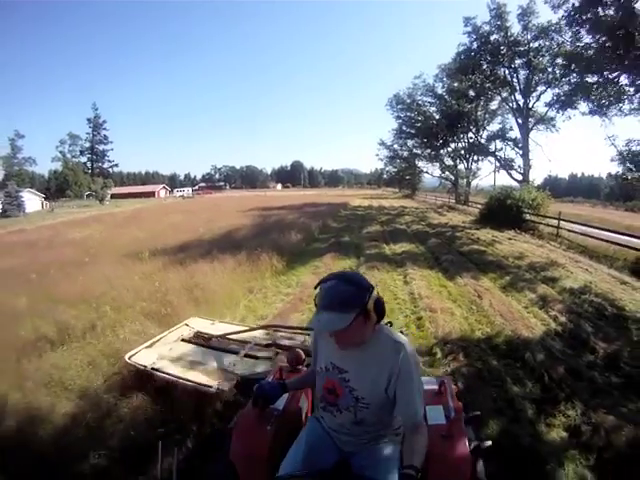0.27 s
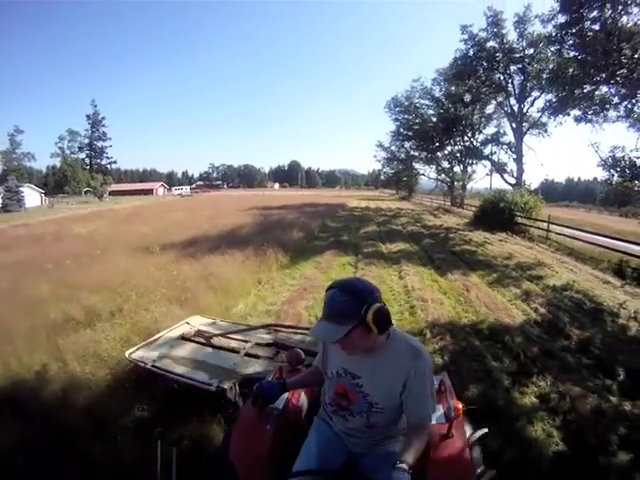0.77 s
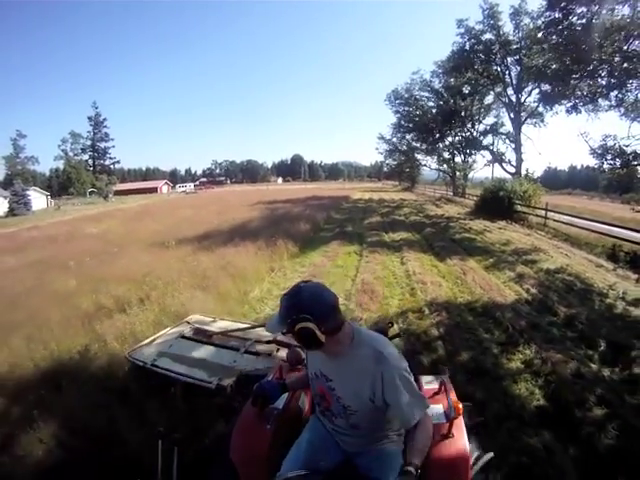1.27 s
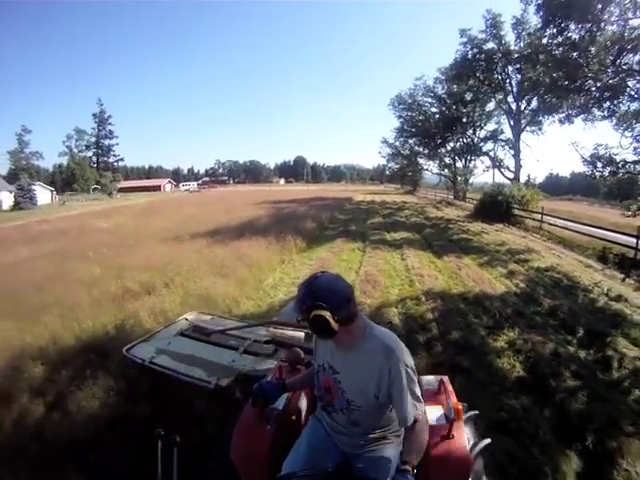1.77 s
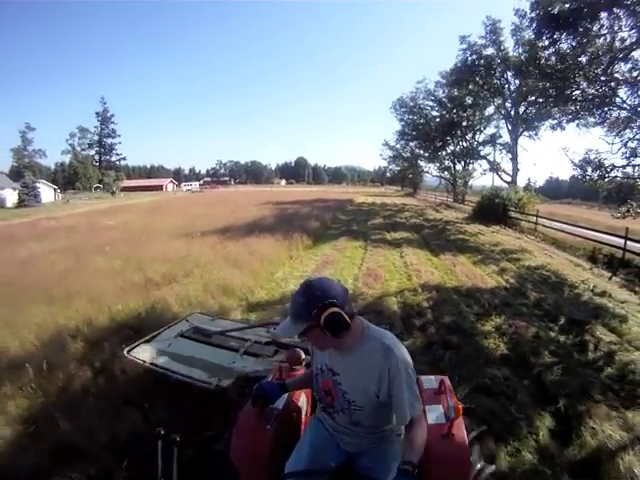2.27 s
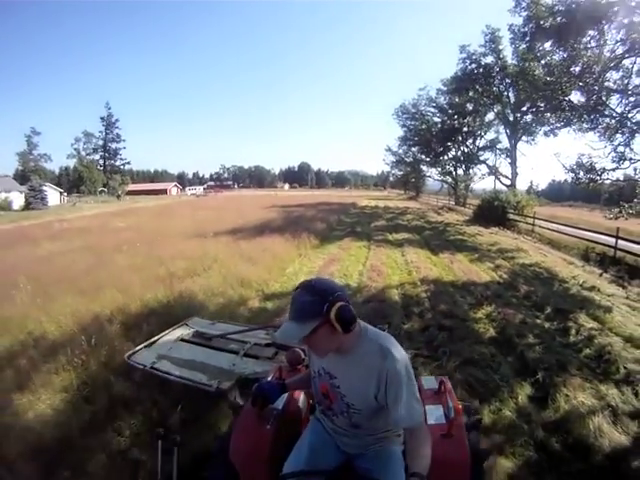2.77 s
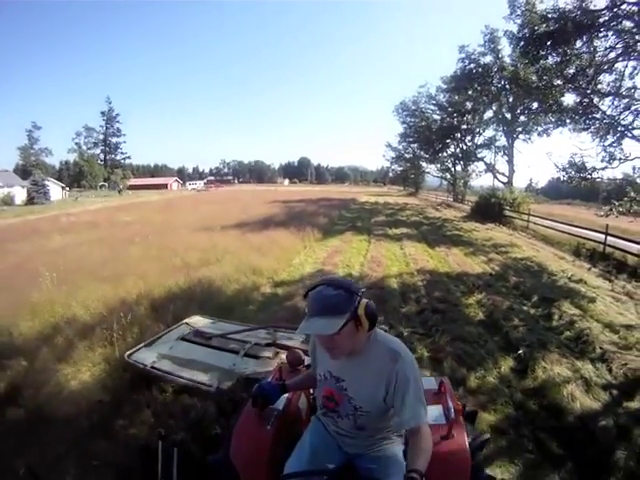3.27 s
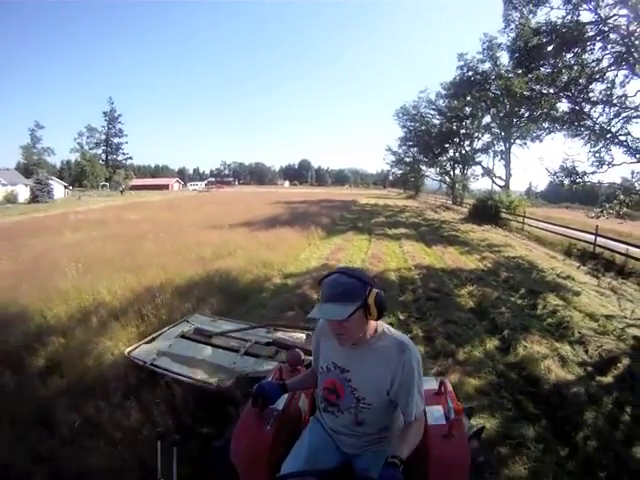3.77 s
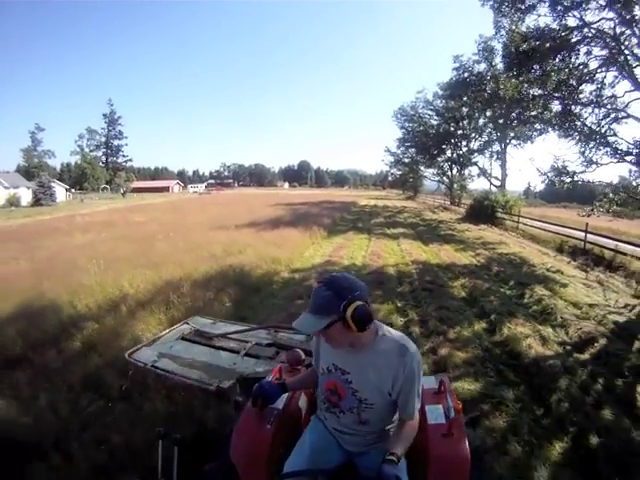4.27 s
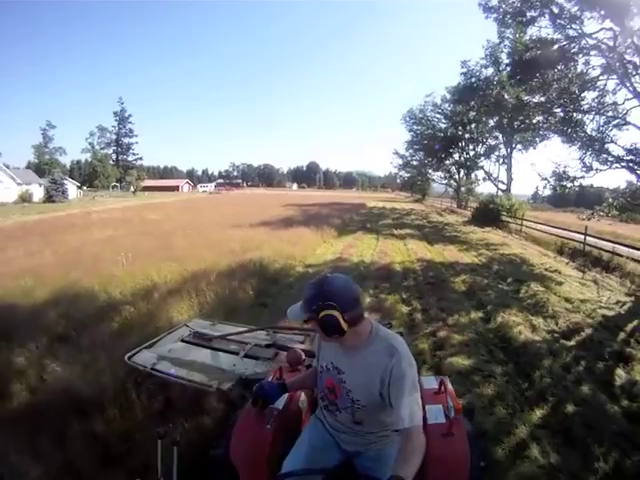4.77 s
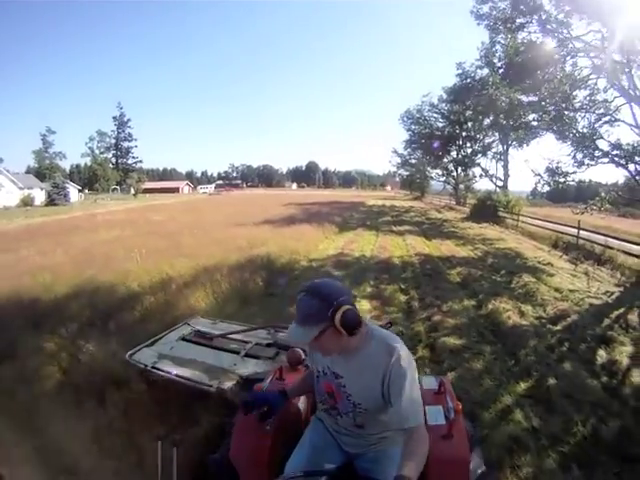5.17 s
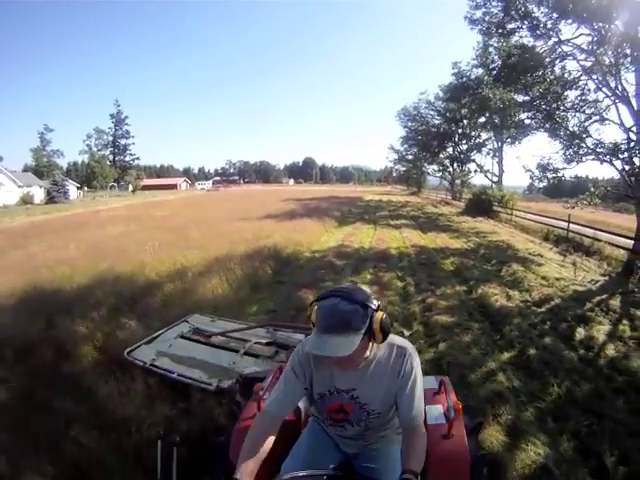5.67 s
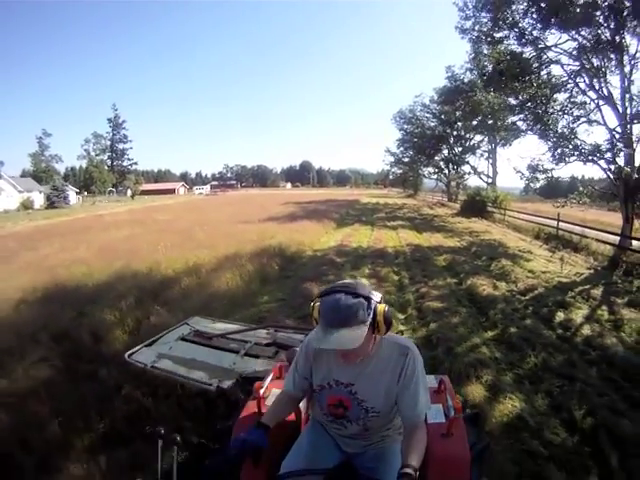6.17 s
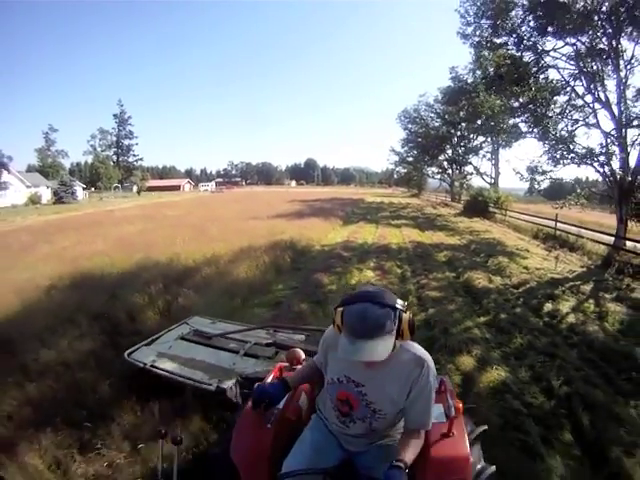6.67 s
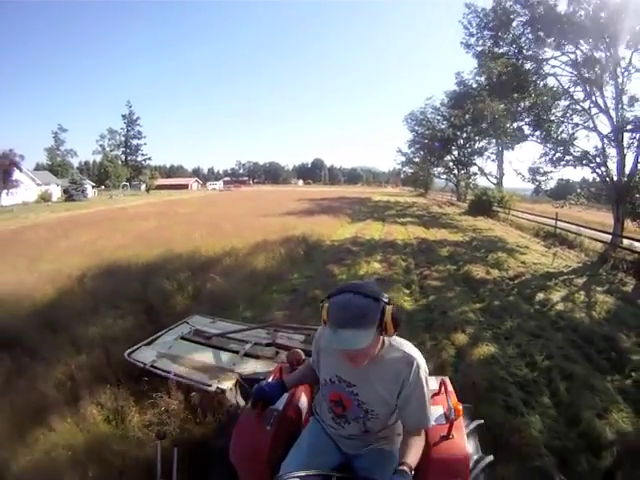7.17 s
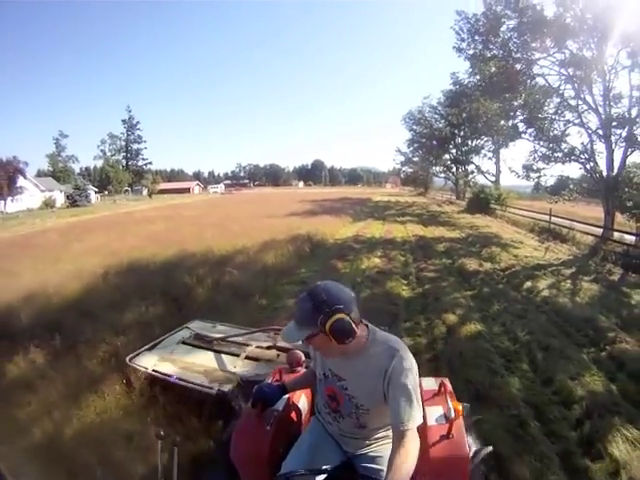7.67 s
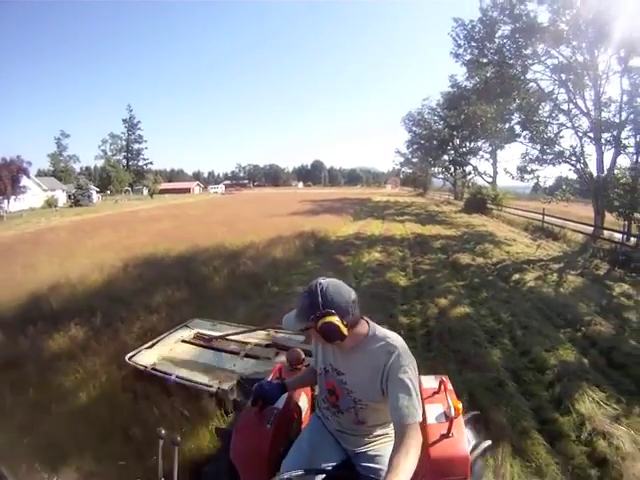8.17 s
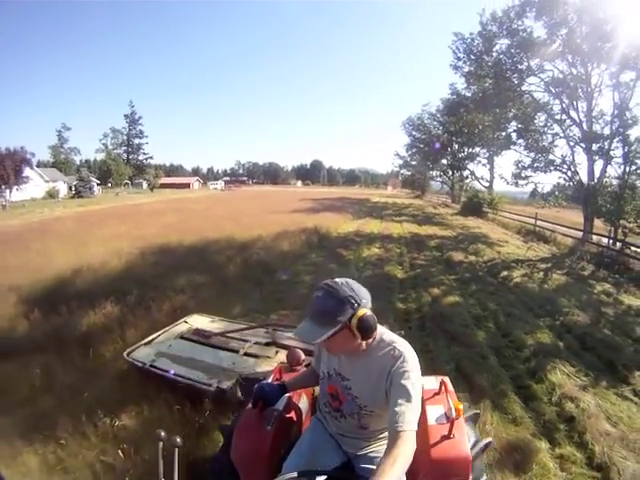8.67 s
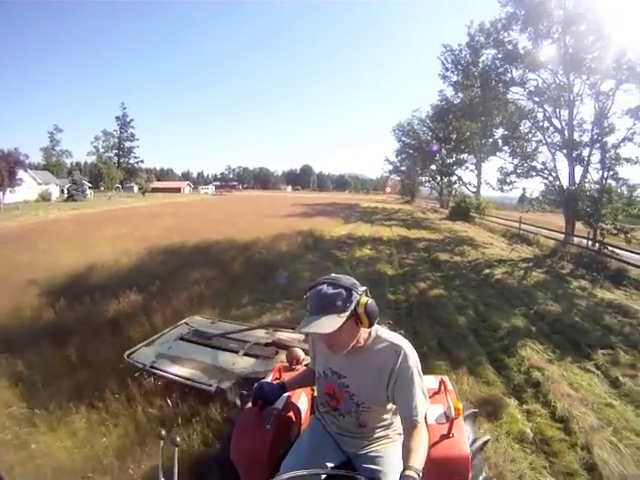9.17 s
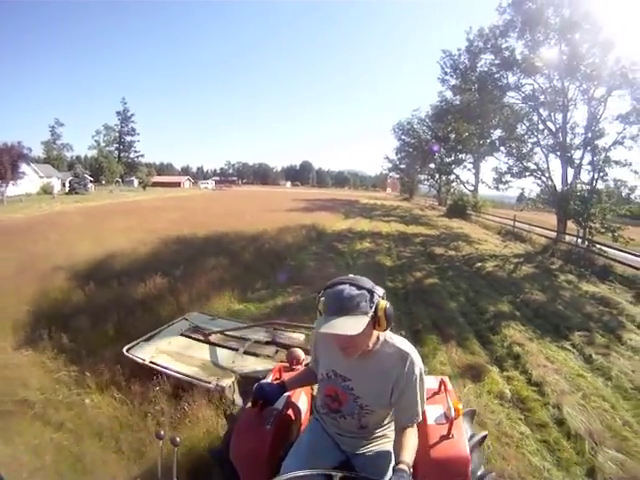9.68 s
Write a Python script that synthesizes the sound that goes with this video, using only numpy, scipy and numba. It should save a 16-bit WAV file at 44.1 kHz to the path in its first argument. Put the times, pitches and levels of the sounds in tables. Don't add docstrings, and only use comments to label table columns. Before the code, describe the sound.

Relentless close clatter of a diesel pulling a drum mower through grass, rasping and whining, sagging slightly, then revving a little faster near seven seconds.

```python
import sys
import numpy as np
from scipy import signal
from scipy.fft import rfft, irfft, next_fast_len
from scipy.io import wavfile
from scipy.ndimage import uniform_filter1d
from numba import njit

SR = 44100
rng = np.random.default_rng(int(sys.argv[2]) if len(sys.argv) > 2 else 0)


def wav_out(sig):
    wavfile.write(sys.argv[1], SR, np.round(np.clip(np.atleast_2d(sig).T, -1, 1) * 32767).astype(np.int16))


def rack_gain(trim_db):
    fader = np.asarray(trim_db, float)
    return 10 ** (fader / 20)


N = 437031
TIME = np.arange(N) / SR


def level(x, db):
    return x * rack_gain(db) / np.sqrt(np.mean(x ** 2))


def ring(x, modes, dead=(), unrelated=False):
    size = next_fast_len(N + SR)
    f = np.fft.rfftfreq(size, 1 / SR) + 1e-6

    def bell(hz, width):
        return 1 / (1 + 1j * (f / hz - hz / f) * hz / width)

    parts = [np.prod(sign) * rack_gain(db) * bell(hz, width) ** 2 for hz, width, db, *sign in modes]
    if unrelated:
        gain = np.sqrt(sum(np.abs(part) ** 2 for part in parts))
    else:
        gain = sum(parts)
    for hz, width, depth in dead:
        gain = gain * (1 - depth * bell(hz, width))
    return irfft(rfft(x, size) * gain, size)[:N]


def walk(rate):
    k = int(SR / rate)
    steps = np.repeat(rng.standard_normal(N // k + 1), k)
    return 1.24 * uniform_filter1d(uniform_filter1d(steps, k), k)[:N]


def bumps(events, half_s):
    return sum(db * np.exp(-.5 * ((TIME - at) / half_s) ** 2) for at, db in events)


def blows(turns, place, db, scatter_db, wander):
    cycle = np.arange(-1, turns[-1] + 1)
    chance = np.clip(rng.standard_normal((len(cycle), 2)), -1.6, 1.6)
    at = np.searchsorted(turns, cycle + place + wander * chance[:, 0])
    keep = (at > 0) & (at < N)
    out = np.zeros(N)
    out[at[keep]] = rack_gain(db + scatter_db * chance[keep, 1])
    return out


# (time [s], speed [cycles/s])
SPEED = [
    (0, 15.186),
    (.8, 15.079),
    (1.98, 15.133),
    (2.12, 15.063),
    (5.79, 14.829),
    (7.09, 15.669),
    (7.55, 16.217),
    (8.56, 16.406),
    (9.91, 16.255),
]


def engine_turns():
    start_turns = -.2139
    return start_turns + np.cumsum(np.interp(TIME, *np.transpose(SPEED))) / SR


SPEED_RANGE = 15.05, 16.35


def fastness(turns):
    return np.interp(np.gradient(turns) * SR, SPEED_RANGE, (0, 1))


# (time [s], cutting effort level [dB], linkage slack level [dB])
GRASS = [(0, -24, 4), (.25, -22.5, 2), (.55, -20, 9), (.85, -21.5, -4), (1.15, -23, 7), (1.55, -22.5, 5),
         (2.05, -23, 4.5), (2.45, -24, 1), (2.8, -22, 7), (3.3, -21.5, 1), (4.1, -22, 3.5), (4.7, -21, 0),
         (5.4, -22, 5), (6.2, -21.5, 3.5), (7.6, -23, -1), (8.4, -22.5, -6.5), (9.5, -19, 4),
         (9.91, -19, 4.5)]


def grass():
    even_grass_db = -21.5
    s, effort_db, slack_db = np.transpose(GRASS)
    return np.interp(TIME, s, effort_db - even_grass_db), np.interp(TIME, s, slack_db)


# (time [s], level [dB])
CLUMPS = [(.2, 1.5), (.4, 0.5), (.57, 0), (1.0, 2.5), (1.16, 3), (1.35, 1.5), (1.68, 3), (2.0, 0.5),
          (2.33, 1), (3.75, 1), (3.92, 2), (4.42, 1), (4.82, 0.5), (5.07, 2), (5.56, 1), (6.1, -0.5),
          (7.95, 3.5), (8.7, 0.5), (9.47, -0.5), (9.6, 1.5)]


def clump_jolts():
    return bumps(CLUMPS, half_s=.046)


# (place [0-1], length [0-1], level [dB])
GUSTS = [
    (0, .05, 2.),
    (.28, .05, 2.5),
    (.75, .1, 1.2),
]
# (pitch [Hz], width [Hz], level [dB])
RUMBLE = [(140, 220, -29), (265, 90, -28)]
# (pitch [Hz], width [Hz], level [dB])
SHELL = [(317, 175, -26.5), (563, 90, -24.5), (695, 51, -22), (788, 113, -28), (1053, 320, -26.5),
         (1067, 25, -24), (1232, 37, -23.5), (1316, 110, -23), (1539, 12, -18.5), (1730, 38, -53),
         (1820, 320, -21.5), (2112, 142, -8), (2464, 310, -18.5), (2630, 26, -20.5), (2767, 160, -16.5),
         (3020, 170, -19.5), (3255, 273, -10.5), (3520, 59, -11.5), (3851, 183, -11.5), (4034, 125, -19.5),
         (4400, 213, -20.5), (4802, 255, -27.5), (5296, 190, -29), (5730, 360, -40)]
# (pitch [Hz], width [Hz], depth [0-1])
DEAD = [(930, 120, .7), (1490, 50, .65), (2910, 90, .75), (4640, 150, .6), (5055, 200, .88)]


def drums(turns):
    gust_db = 0
    for place, length, db in GUSTS:
        away = (turns - place + .5) % 1 - .5
        gust_db = gust_db + db * np.exp(-.5 * (away / length) ** 2)
    shake = rack_gain(gust_db + .43 * walk(12) + 1.56 * walk(70)) * rng.standard_normal(N)
    stems = (rng.random(N) < 250 / SR) * rng.uniform(-1.18, 1, N)
    return level(ring(shake + 10.3 * stems, RUMBLE + SHELL, DEAD, unrelated=True), 0)


# (pitch [Hz], width [Hz], level [dB])
COVER = [
    (454.1, 39, 5),
    (423.7, 58, -3.5),
]


def hum(turns):
    shaft_beats = 28
    air = rack_gain(walk(3.42)) * rng.standard_normal(N)
    nudge = blows(turns, .2278, 29, scatter_db=.5, wander=.017)
    wavering = rack_gain(-27) * np.sin(2 * np.pi * COVER[0][0] * TIME + 4.5 * walk(14))
    locked = rack_gain(-25) * fastness(turns) ** 2 * np.sin(2 * np.pi * shaft_beats * turns + .4 * walk(5))
    return level(ring(air + nudge + wavering + locked, COVER), 0)


# (beats [per cycle], level [dB], phase [0-1])
ENGINE_TONES = [(4, -49, .33), (5, -56, .93), (13, -54, .66), (16, -46.5, .3), (17.1, -49, 0), (21, -57, 0)]
# (teeth met [per cycle], level [dB], phase waver [rad])
GEARS = [
    (116, -37.5, 1.3),
    (71, -50, .6),
    (100, -52, .8),
]


def gears(turns):
    out = 0
    for beats, db, phase in ENGINE_TONES:
        out = out + np.sqrt(2) * rack_gain(db) * np.sin(2 * np.pi * (beats * turns + phase))
    for teeth, db, waver in GEARS:
        throb = rack_gain(2.5 * walk(12) + 4.5 * np.cos(2 * np.pi * (turns - .6)))
        whine = np.sin(2 * np.pi * teeth * turns + waver * walk(35))
        out = out + level(throb * whine, db)
    return out


# (place [0-1], level [dB], clean share [0-1])
FOLLOWERS = [(.205, -13, .6), (.26, -11.5, .7), (.55, -16, .6), (.8, -19, .6), (.68, -22, .4),
             (.4, -21, .4)]
# (pitch [Hz], width [Hz], level [dB], polarity [+-1])
KNOCKED = [(2158, 135, 0, 1), (2288, 126, -12.3, -1), (2081, 72, -17.8, -1), (2392, 110, -16.4, -1),
           (1909, 84, -21.7, -1)]
# (pitch [Hz], width [Hz], level [dB])
KNOCKED_WEAKLY = [(1061, 76, -26.5), (1357, 99, -30), (1760, 50, -21.5), (2793, 270, -24.5),
                  (3784, 200, -20)]


def knock(turns, follower_db):
    lead = .043
    main = blows(turns, -lead, 0, scatter_db=.8, wander=.001)
    rattle = np.exp(-np.arange(SR // 50) / SR / .0022)
    rattle /= np.sqrt(np.sum(rattle ** 2))
    loose = 0
    for place, db, clean in FOLLOWERS:
        hits = blows(turns, place - lead, db, scatter_db=2.2, wander=.002)
        rattled = signal.fftconvolve(hits, rattle)[:N] * rng.standard_normal(N)
        loose = loose + clean * hits + (1 - clean) * rattled
    return level(ring(main + 1.01 * rack_gain(follower_db) * loose, KNOCKED + KNOCKED_WEAKLY), 0)


# (time [s], level [dB])
ODD_KNOCKS = [(.278, 2.1), (.476, 1.6), (.675, 3.1), (1.138, -1.6), (1.536, 2.1), (1.665, -1.6),
              (1.734, 2.6), (2.596, 2.6), (2.662, 2.1), (3.13, 5.1), (3.797, 3.1), (3.93, 2.1),
              (4.131, 1.6), (4.466, 2.1), (5.205, 1.6), (5.34, 2.6), (5.609, 2.6), (6.079, 2.1),
              (6.278, 1.6), (6.541, 2.6), (6.8, 1.6), (7.434, 2.6), (8.051, 2.1), (8.602, 2.6),
              (9.458, -2.1), (9.519, -2.1)]


def odd_knocks():
    return bumps(ODD_KNOCKS, half_s=.02)


# (place [0-1], level at low speed [dB], level at high speed [dB])
PUFFS = [
    (.157, 3, 2.7),
    (.196, 0, -.4),
    (.431, -5.7, -1.5),
    (.698, -3.3, .2),
]
# (pitch [Hz], width [Hz], level [dB], polarity [+-1])
PIPE = [(76.5, 46, -8.8, -1), (105, 38, -5.9, -1), (155.5, 51, -4.4, 1), (194.5, 30, 0, -1),
        (242, 44, -17.5, -1)]


def exhaust(turns):
    fast = fastness(turns)
    puffs = 0
    for place, slow_db, fast_db in PUFFS:
        size = rack_gain(slow_db + fast * (fast_db - slow_db))
        puffs = puffs + size * blows(turns, place, 0, scatter_db=.7, wander=.0015)
    return level(ring(puffs, PIPE, dead=[(44, 22, .7)]), 0)


def open_throttle(pipe, turns):
    split_hz, wide_open = 145, .6
    gain = uniform_filter1d(np.gradient(np.gradient(turns) * SR) * SR, SR // 2)
    throttle = np.clip(gain / wide_open, 0, 1) * (1 - fastness(turns) ** 2)
    low = signal.sosfiltfilt(signal.butter(4, split_hz, fs=SR, output="sos"), pipe)
    return rack_gain(throttle) * low + rack_gain(-6 * throttle) * (pipe - low)


def scene():
    turns = engine_turns()
    fast = fastness(turns)
    effort_db, slack_db = grass()
    jolt_db = clump_jolts()
    hiss_db = -19.5 + effort_db + jolt_db
    hum_db = -31 - .5 * fast + .42 * effort_db
    knock_db = -16.5 - 1.3 * fast + odd_knocks()
    follower_db = -2 + 8.5 * fast - .5 * (effort_db + jolt_db) + slack_db
    pipe_db = -30 - 1.7 * fast + .47 * effort_db + jolt_db
    mower = rack_gain(hiss_db) * drums(turns) + rack_gain(hum_db) * hum(turns)
    pipe = open_throttle(exhaust(turns), turns)
    engine = gears(turns) + rack_gain(knock_db) * knock(turns, follower_db) + rack_gain(pipe_db) * pipe
    return (mower + engine)[None]


@njit
def follow(size, grab, creep, start):
    out, e = np.empty(len(size)), start
    for i in range(len(size)):
        e += (size[i] - e) * (grab if size[i] > e else creep)
        out[i] = e
    return out


def gain_control(dry):
    grab_s, creep_s, held_level = .002, .22, .46
    limit, knee = .75, 6
    peak = follow(np.abs(dry[0]), 1 / (grab_s * SR), 1 / (creep_s * SR), held_level)
    even = dry * held_level / peak
    return even / (1 + (even / limit) ** knee) ** (1 / knee)


def slow_converter(sound):
    slow = signal.resample_poly(sound, 40, 147, axis=1)
    held = np.repeat(slow, 4, axis=1)
    return signal.resample_poly(held, 147, 160, axis=1)[:, :N]


def band_limit(x):
    return signal.sosfilt(signal.butter(12, 16440, fs=SR, output="sos"), x)


def record(dry):
    held = slow_converter(gain_control(dry))
    top_cut = signal.ellip(10, .3, 58, 15290, fs=SR, output="sos")
    return band_limit(signal.sosfilt(top_cut, held))


dry = scene()
out = record(dry)
wav_out(out)
```